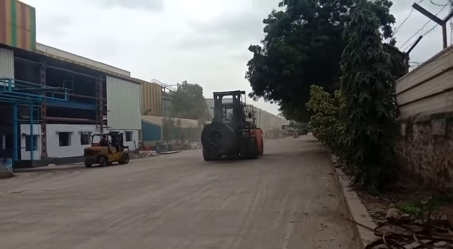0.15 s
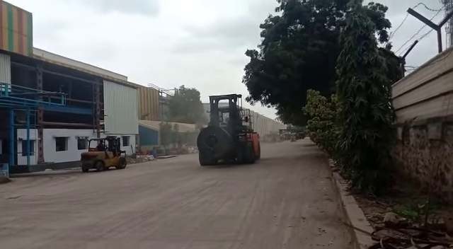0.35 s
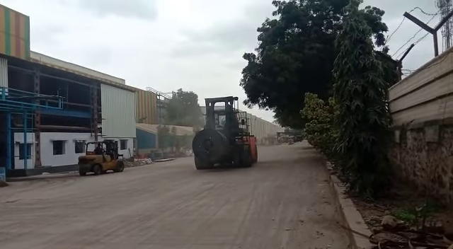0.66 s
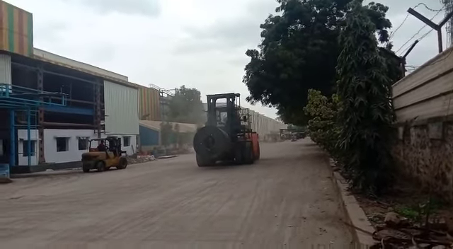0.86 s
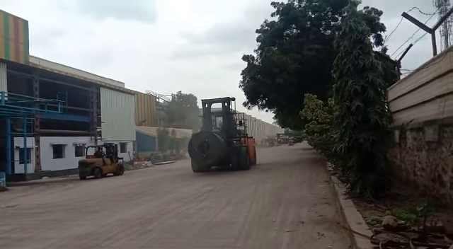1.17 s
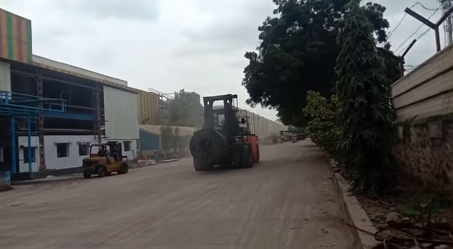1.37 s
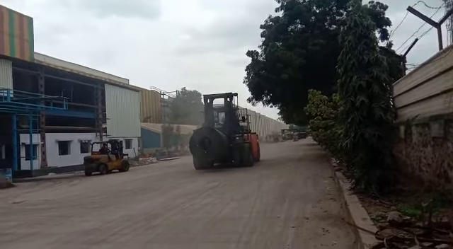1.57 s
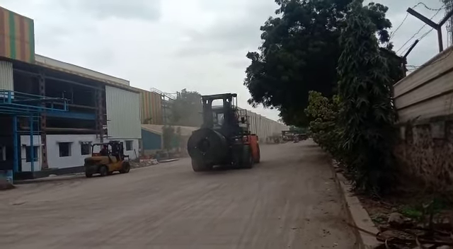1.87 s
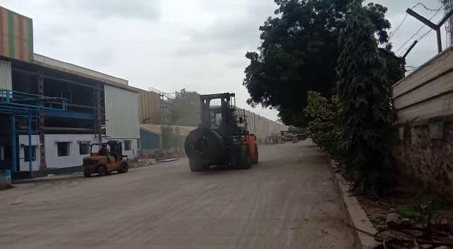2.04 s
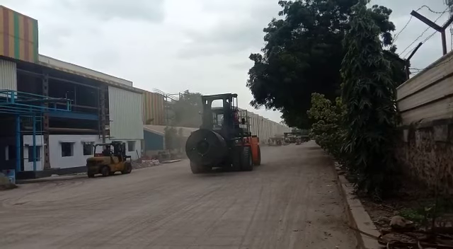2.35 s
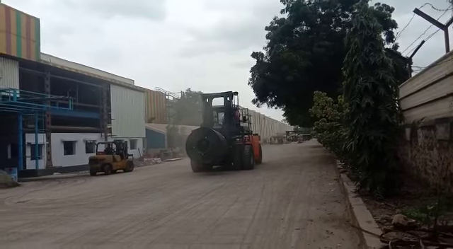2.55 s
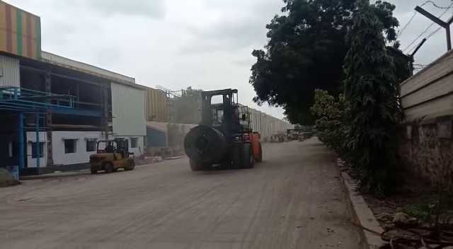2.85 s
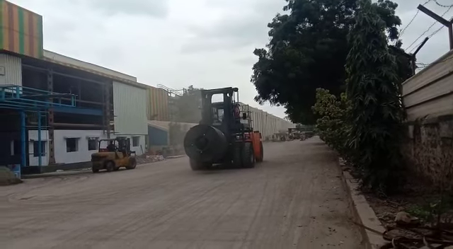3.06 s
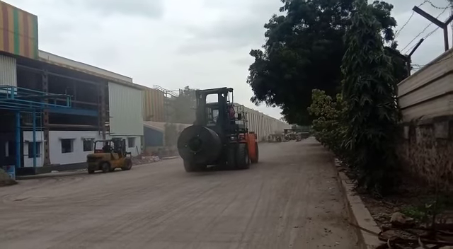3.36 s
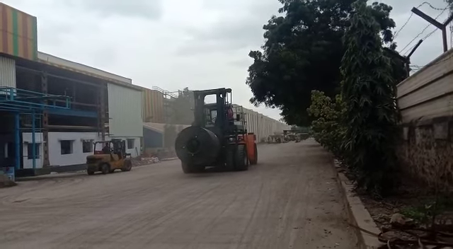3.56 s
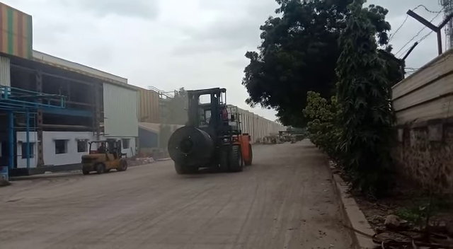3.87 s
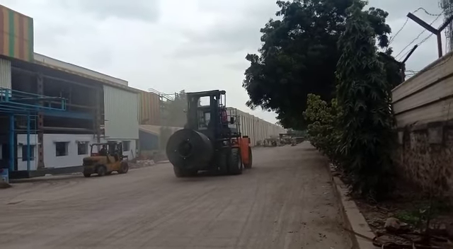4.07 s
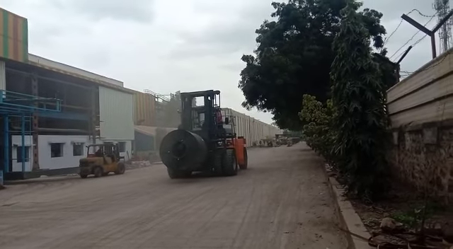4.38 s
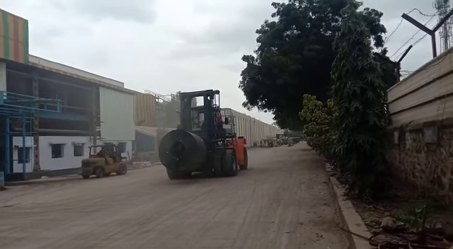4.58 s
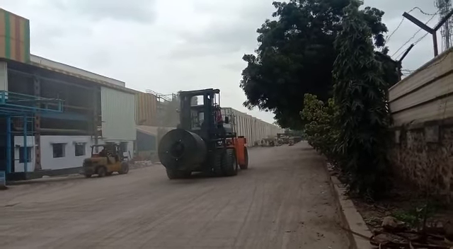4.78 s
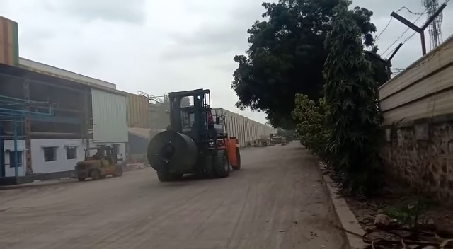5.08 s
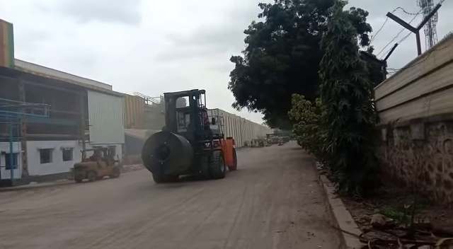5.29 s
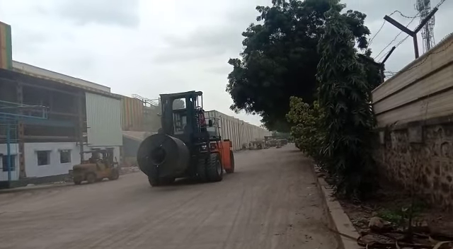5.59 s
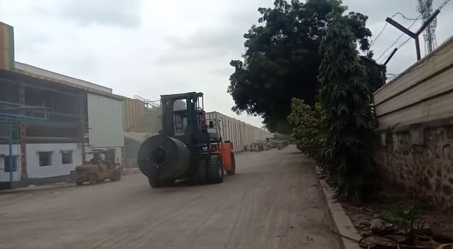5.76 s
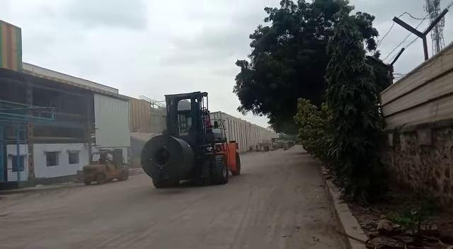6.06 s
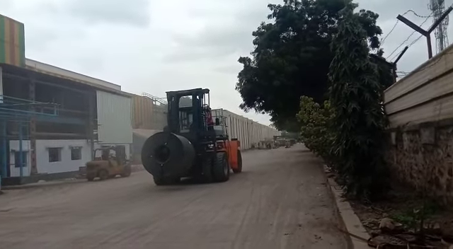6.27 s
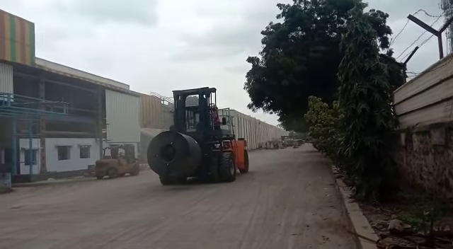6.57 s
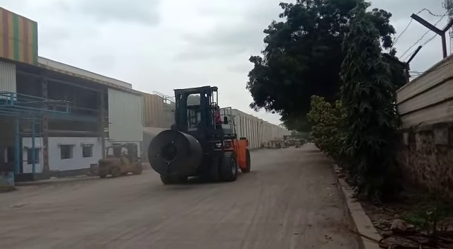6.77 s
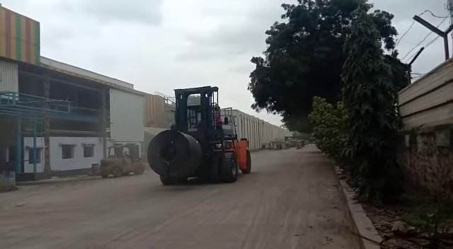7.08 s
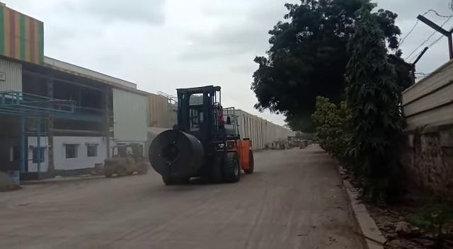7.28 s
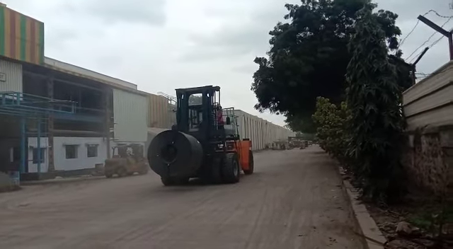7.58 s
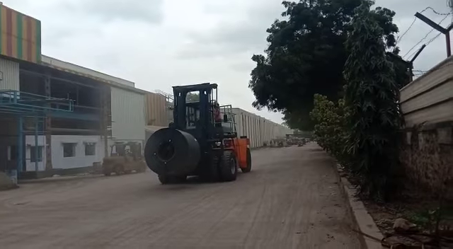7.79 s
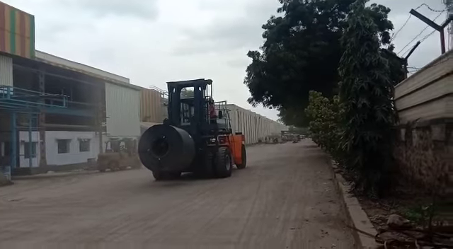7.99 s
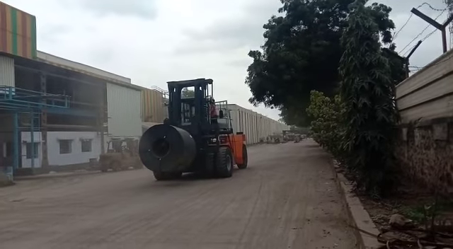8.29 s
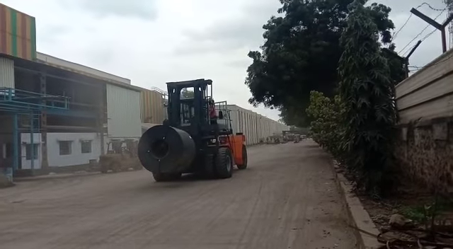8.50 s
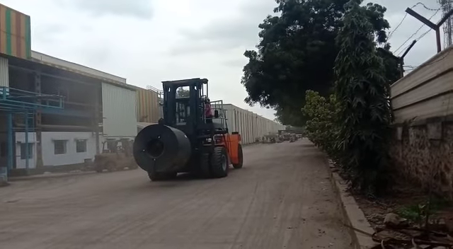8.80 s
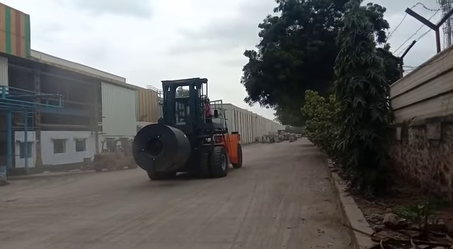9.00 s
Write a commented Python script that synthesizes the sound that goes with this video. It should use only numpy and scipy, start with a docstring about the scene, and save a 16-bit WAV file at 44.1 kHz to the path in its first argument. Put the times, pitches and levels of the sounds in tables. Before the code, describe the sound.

Continuous heavy engine noise from a roadside position: low booming exhaust, rough metallic whine around the upper middle range, broad fan air and thin hiss. A second diesel clatters evenly throughout. The forklift's pitch lifts early on, holds, then drops midway; the boom fades and its note wavers while whine, rumble and rush carry on, slightly closer.

```python
"""A heavy diesel forklift carries a steel coil along a concrete road, nearing throughout; a second engine runs steadily.
At first its exhaust booms under load; near 2.3 s the engine steps up and a rough drone swells with it.
From 4.5 s the driver eases off: pitch and boom sink, then waver; gear whine, rumble and fan noise go on.
Exhaust, drone and hum are sines; whine, rumble, rush and hiss are coloured noise.
The second engine's clatter is a noise cycle repeated every two crank turns."""
import sys
import numpy as np
from scipy import signal
from scipy.fft import rfft, irfft, next_fast_len
from scipy.io import wavfile
from scipy.ndimage import uniform_filter1d, minimum_filter1d

SR = 44100
rng = np.random.default_rng(int(sys.argv[2]) if len(sys.argv) > 2 else 0)


def int16_out(signal):
    """Quantize to a 16-bit WAV file."""
    q = np.round(np.clip(np.atleast_2d(signal).T, -1, 1) * 32767)
    wavfile.write(sys.argv[1], SR, q.astype(np.int16))


N = 403074
TIME_S = np.arange(N) / SR

# Driver's throttle: time_s, firing_hz
THROTTLE = [(0, 100.1), (.16, 93.16), (2.26, 93.13), (2.42, 100.4), (4.45, 100.1), (5.0, 86), (5.35, 79),
            (6.05, 83.03), (6.4, 82.3), (7.1, 91), (7.7, 87.5), (8.4, 78.8), (9.14, 85.3)]
# Exhaust boom level, set by engine load: time_s, level_db
BOOM_LEVEL = [(0, -29), (.12, -20.5), (1.65, -18.3), (3.9, -24.5), (4.52, -20.5), (5.15, -42),
              (6.05, -33.5), (7.7, -36), (8.35, -35), (9.14, -35)]
# Firing harmonics 1, 2, 3 relative to the boom level: level_db
EXHAUST_HARMONICS_DB = [0.5, -22.5, -26]
# Drive whine level: time_s, level_db
WHINE_LEVEL = [(0, -26), (1.5, -27), (2.27, -24.5), (2.65, -26), (3.15, -23.5), (3.9, -27), (5.1, -24),
               (7.5, -24.5), (9.14, -23)]
# Drive casing resonances: centre_hz, width_hz, relative_db
CASING_MODES = [(1256, 45, -1), (1178, 94, -10.5), (1347, 170, -7)]
# Exhaust rumble level: time_s, level_db
RUMBLE_LEVEL = [(0, -28.5), (1.0, -28), (2.4, -27), (4.9, -27), (6.6, -29), (7.75, -26.5), (8.4, -29),
                (9.14, -24.5)]
# Exhaust rumble spectrum: frequency_hz, relative_db_per_hz
RUMBLE_COLOUR = [(25, -47), (45, -18), (62, -15), (82, 1), (115, -0.5), (160, 1.5), (260, -5.5),
                 (320, -6.5), (400, -14), (600, -20), (1200, -63), (8000, -90)]
# Fan rush spectrum: frequency_hz, relative_db_per_hz
RUSH_COLOUR = [(60, -40), (250, -18.5), (450, -5), (700, -3.5), (1000, -3), (1500, 0), (1850, -0.5),
               (2300, 1.5), (2900, -0.7), (3650, -8), (5000, -13), (6500, -17.5), (8200, -28), (11000, -39),
               (16000, -47)]
# Fan hiss spectrum: frequency_hz, relative_db_per_hz
HISS_COLOUR = [(4500, -22.5), (5500, -5), (6250, 0.5), (6650, -4.5), (7100, -1.5), (7600, -8), (8200, -21),
               (10000, -31), (13900, -45), (14800, -28), (16000, -24)]
# Forklift approach: time_s, distance_m
DISTANCE = [(0, 31.2), (2.3, 29.1), (4.4, 26.4), (9.14, 25.5)]
# Steady engine's hum lines: multiple_of_crank_rate
HUM_ORDERS = [2, 5, 5.5, 7, 8, 11, 14, 16, 18, 20, 24, 31, 33, 39, 42.5, 43, 57, 58, 72.5, 76.5]
# Level of each hum line: level_db
HUM_LEVELS_DB = [-56, -39.5, -47, -42.5, -35.5, -36.5, -43.5, -44, -44, -44.5, -54, -41.5, -50.5, -43.5,
                 -44, -44.5, -42.5, -39.5, -43, -46]
# Clatter spectrum: frequency_hz, relative_db_per_hz
CLATTER_COLOUR = [(90, -1), (150, 6), (230, 7.5), (400, -8), (600, -13), (850, 0.5), (1020, -8),
                  (1250, 7.5), (1550, 7), (1800, -2.5), (2250, 3), (2850, -2.5), (3600, -10.5), (6000, -23),
                  (12000, -70)]

CRANK_HZ = 21.266  # steady engine


def from_db(db):
    """Decibels to gain."""
    return 10 ** (np.asarray(db) / 20)


def rms_one(x):
    """Scale to unit power."""
    return x / np.sqrt(np.mean(x ** 2) + 1e-20)


def level_power(x, window):
    """Divide by the running RMS over a window in samples."""
    return x / np.sqrt(uniform_filter1d(x ** 2, window))


def in_time(rows):
    """Interpolate a time_s, value table at every sample."""
    time_s, value = np.transpose(rows)
    return np.interp(TIME_S, time_s, value)


def colour(points, hz):
    """Spectral gain, interpolated in dB over log frequency."""
    at_hz, db = np.transpose(points)
    return from_db(np.interp(np.log(hz + 1e-6), np.log(at_hz), db))


def noise(gain_at):
    """Unit-power noise, coloured by a gain for each frequency."""
    size = next_fast_len(N)
    white = rfft(rng.standard_normal(size))
    hz = np.arange(len(white)) * SR / size
    return rms_one(irfft(white * gain_at(hz), size)[:N])


def drift(rate_hz):
    """Slow random signal of spread 1: noise through two equal low-pass poles."""
    step = 100  # samples
    pole = np.exp(-2 * np.pi * rate_hz * step / SR)
    white = rng.standard_normal(N // step + 2002)
    slow = signal.lfilter([1], [1, -2 * pole, pole * pole], white)[2000:]  # settled part
    return np.interp(np.arange(N) / step, np.arange(len(slow)), rms_one(slow))


def turns(hz):
    """Cycles completed at a changing rate."""
    return np.cumsum(hz) / SR


def approach_db():
    """Gain from the shrinking distance: pressure goes as 1 / distance."""
    distance_m = in_time(DISTANCE)
    return 20 * np.log10(distance_m[0] / distance_m)


def exhaust(firing_cycles, boom_db):
    """The silencer leaves a nearly pure tone; a pipe resonance barks at harmonic 2, hardest on slowing."""
    flutter_db, jitter_cycles = 0.6, 0.0096
    bark_db, bark_hz, bark_width_hz = -39, 175, 7
    overrun_db_per_hz_per_s = 0.3264
    phase = 2 * np.pi * (firing_cycles + jitter_cycles * drift(14))
    tone = sum(from_db(db) * np.sin((k + 1) * phase) for k, db in enumerate(EXHAUST_HARMONICS_DB))
    boom = tone * from_db(boom_db + flutter_db * drift(6.3))

    firing_hz = np.gradient(firing_cycles) * SR
    acceleration_hz_per_s = uniform_filter1d(np.gradient(firing_hz) * SR, SR // 5)
    slowing_hz_per_s = np.maximum(0, -acceleration_hz_per_s)
    detuning = (2 * firing_hz - bark_hz) / bark_width_hz
    bark_level_db = bark_db + overrun_db_per_hz_per_s * slowing_hz_per_s + 2 * drift(1.6)
    bark = from_db(bark_level_db) / (1 + detuning ** 2) * np.sin(2 * phase)
    return np.sqrt(2) * (boom + bark)


def drone(firing_hz):
    """A rough drone geared to the engine, higher and louder while the drive lags a rise in engine speed."""
    ratio, roughness_hz = 2.71, 7
    full_speed_db, full_speed_hz, speed_db_per_hz = -39, 101, 0.3
    catch_up_s, slip_pitch_hz_per_hz, slip_db_per_hz = 1.0, 2.0, 1.5
    keep = np.exp(-1 / (catch_up_s * SR))
    change_hz = firing_hz - np.mean(firing_hz[:SR])
    drive_hz = signal.lfilter([1 - keep], [1, -keep], change_hz)
    slip_hz = np.maximum(0, change_hz - drive_hz)
    phase = 2 * np.pi * turns(ratio * firing_hz + slip_pitch_hz_per_hz * slip_hz)
    level_db = full_speed_db + speed_db_per_hz * (firing_hz - full_speed_hz) + slip_db_per_hz * slip_hz
    rough_tone = drift(roughness_hz) * np.cos(phase) + drift(roughness_hz) * np.sin(phase)
    return from_db(level_db) * rough_tone


def casing_gain(hz):
    """Summed power of the drive casing's resonances, as a gain."""
    power = 0
    for centre_hz, width_hz, db in CASING_MODES:
        detuning = (hz - centre_hz) / width_hz
        power = power + from_db(db) ** 2 / (1 + 2 * detuning ** 2) ** 2
    return np.sqrt(power)


def whine(throb_hz):
    """Rough gear contact rings the drive casing, with random surges and a throb at a wandering rate."""
    throb_db, surge_db, surge_hz = 0.55, 1.24, 3.7
    throb = np.sin(2 * np.pi * turns(throb_hz * (1 + 0.053 * drift(0.87))))
    ringing = level_power(noise(casing_gain), SR // 8)
    return ringing * from_db(in_time(WHINE_LEVEL) + surge_db * drift(surge_hz) + throb_db * throb)


def exhaust_rumble(firing_cycles):
    """Uneven low exhaust noise, puffing with each firing."""
    puff_depth, lump_db = 0.17, 0.87
    puffs = 1 + puff_depth * np.cos(2 * np.pi * firing_cycles)
    rumble = noise(lambda hz: colour(RUMBLE_COLOUR, hz))
    return rumble * from_db(in_time(RUMBLE_LEVEL) + lump_db * drift(12)) * puffs


def fan(near_db):
    """Broad air rush and a thin flickering hiss, growing as the forklift nears."""
    rush_db, hiss_db = -24.5, -36  # at the starting distance
    gust_db, flicker_db = 0.5, 0.13
    rush = noise(lambda hz: colour(RUSH_COLOUR, hz)) * from_db(rush_db)
    hiss = noise(lambda hz: colour(HISS_COLOUR, hz)) * from_db(hiss_db + flicker_db * drift(21))
    return (rush + hiss) * from_db(near_db + gust_db * drift(15.8))


def hum(crank_turns):
    """Clean lines of the steady engine fade a little in moving air; the loudest beats slowly."""
    fade_db, fade_hz = 1.2, 0.68
    beat_s, beat_peak_s, beat_depth_db = 2.08, 1.32, 4.0
    beat_db = beat_depth_db * np.cos(2 * np.pi * (TIME_S - beat_peak_s) / beat_s)
    out = 0
    for order, db in zip(HUM_ORDERS, HUM_LEVELS_DB):
        sway_db = fade_db * drift(fade_hz)
        if db == max(HUM_LEVELS_DB):
            sway_db = sway_db + beat_db
        out = out + from_db(db + sway_db) * np.sin(2 * np.pi * (order * crank_turns + rng.random()))
    return np.sqrt(2) * out


def clatter(crank_turns):
    """Valve and injector noise repeats every two turns, by several paths that fade in and out."""
    paths, cycle_size, knock_depth, change_hz = 4, 8192, 0.18, 0.26
    level_db = -26.0
    hz = np.arange(cycle_size // 2 + 1) * CRANK_HZ / 2
    gain = colour(CLATTER_COLOUR, hz) * (hz > CLATTER_COLOUR[0][0])
    position = crank_turns / 2 % 1 * cycle_size
    out = 0
    for _ in range(paths):
        cycle = irfft(gain * np.exp(2j * np.pi * rng.random(len(hz))))
        out = out + drift(change_hz) * np.interp(position, np.arange(cycle_size), cycle)
    knock = 1 + knock_depth * np.cos(4 * np.pi * crank_turns)  # two firings a turn
    return from_db(level_db) * rms_one(level_power(out, SR // 2) * knock)


def scene():
    """Forklift and steady engine, heard from the roadside."""
    firing_hz = in_time(THROTTLE)
    firing_cycles = turns(firing_hz)
    near_db = approach_db()
    throb_hz = near_db  # 1 Hz per dB of approach: quickens from 0 to about 1.75 Hz
    crank_turns = turns(CRANK_HZ * (1 + 0.000506 * drift(1.57)))
    forklift = exhaust(firing_cycles, in_time(BOOM_LEVEL)) + drone(firing_hz) + whine(throb_hz)
    forklift = forklift + exhaust_rumble(firing_cycles) + fan(near_db)
    steady_engine = hum(crank_turns) + clatter(crank_turns)
    return (forklift + steady_engine)[None]


def record(dry):
    """A fast limiter holds down peaks; a short fade-in and a steep low-pass follow."""
    ceiling, window, fade_in_s, cutoff_hz = 0.41, 441, 0.004, 15500  # window in samples
    allowed = np.minimum(1, ceiling / (np.abs(dry) + 1e-9))
    gain = uniform_filter1d(minimum_filter1d(allowed, window), window)
    limited = dry * gain * np.minimum(1, TIME_S / fade_in_s)
    low_pass = signal.ellip(12, 0.1, 80, cutoff_hz, fs=SR, output="sos")
    return signal.sosfilt(low_pass, limited)


dry = scene()
out = record(dry)
int16_out(out)
```